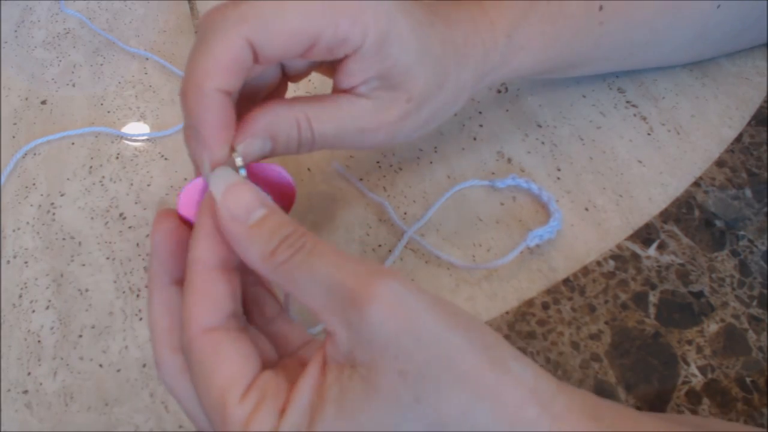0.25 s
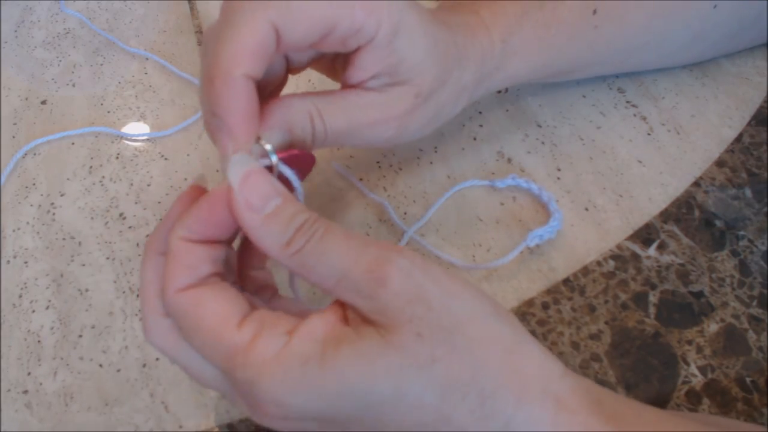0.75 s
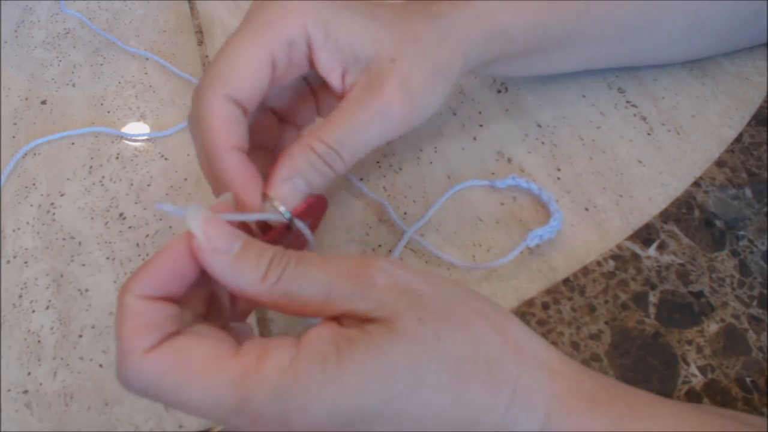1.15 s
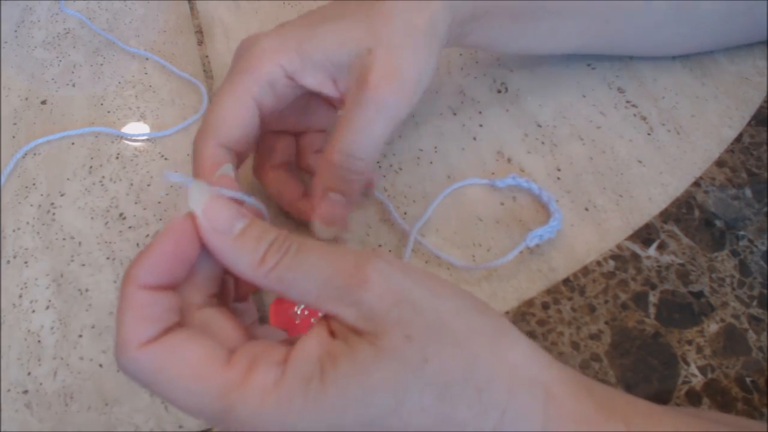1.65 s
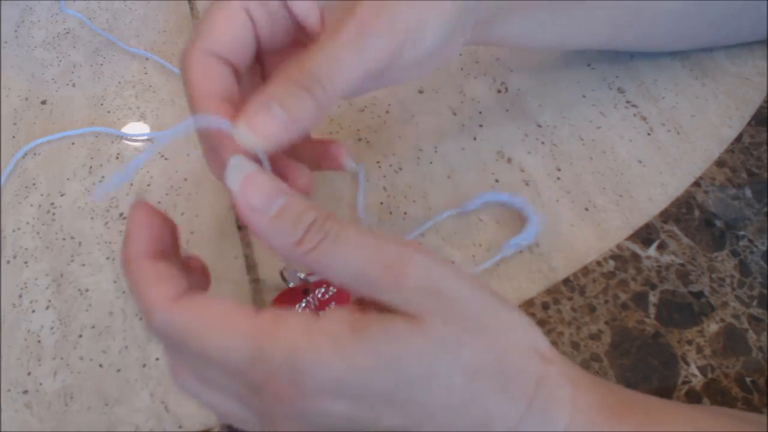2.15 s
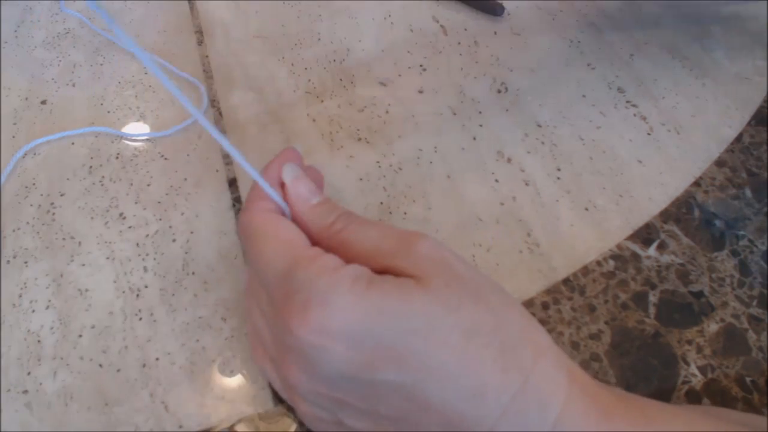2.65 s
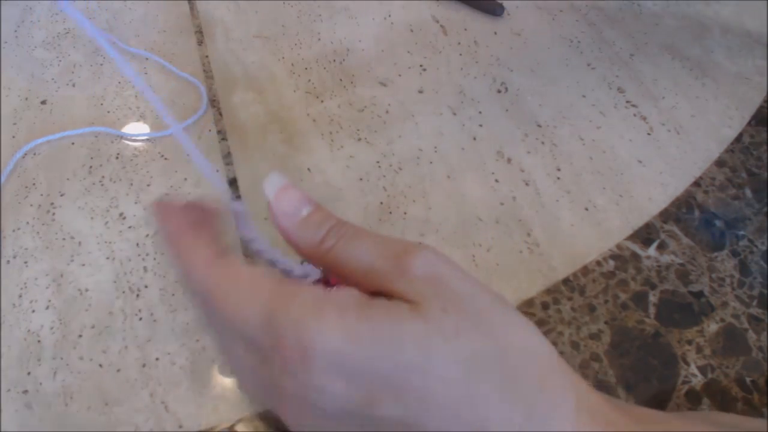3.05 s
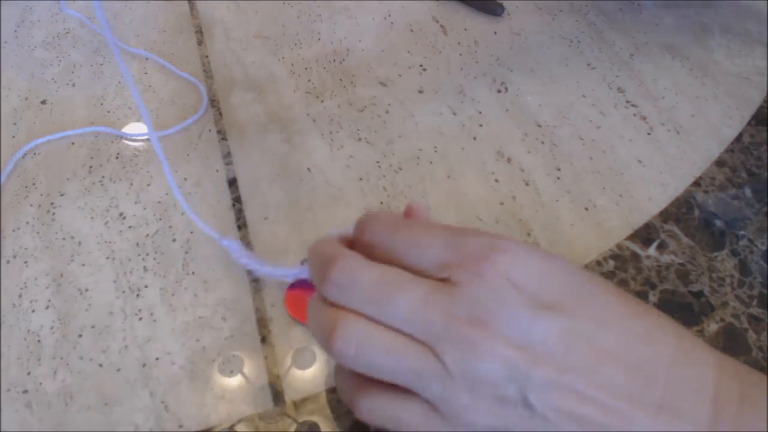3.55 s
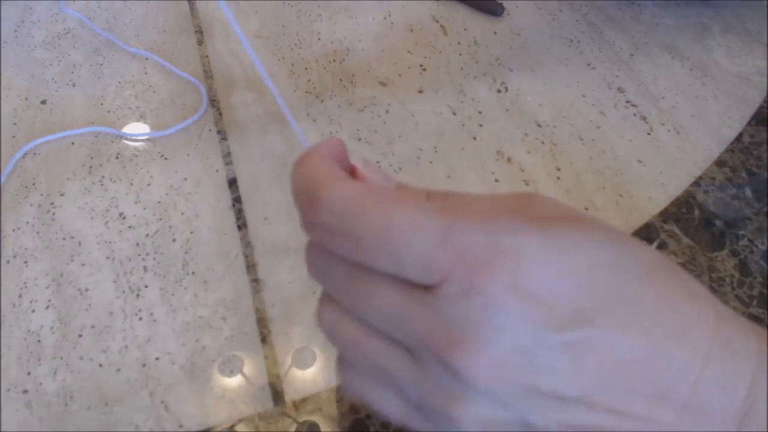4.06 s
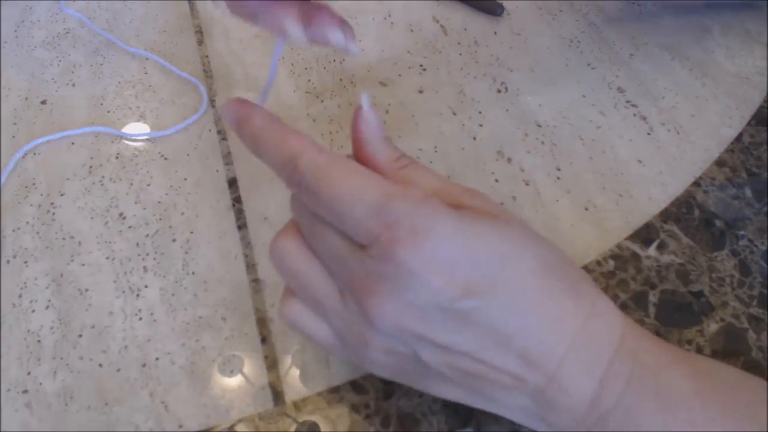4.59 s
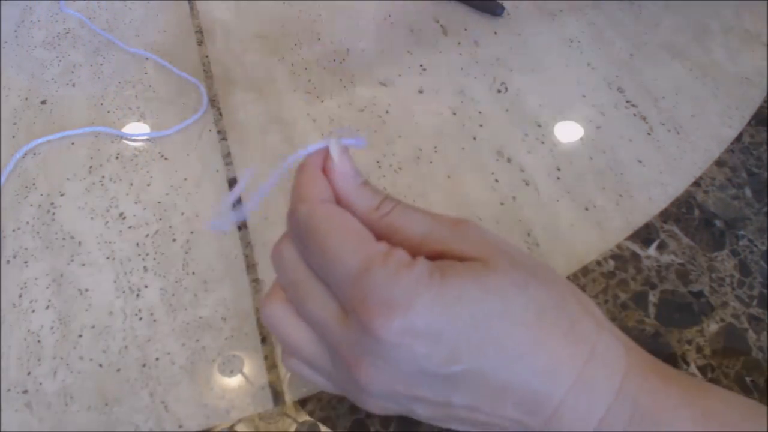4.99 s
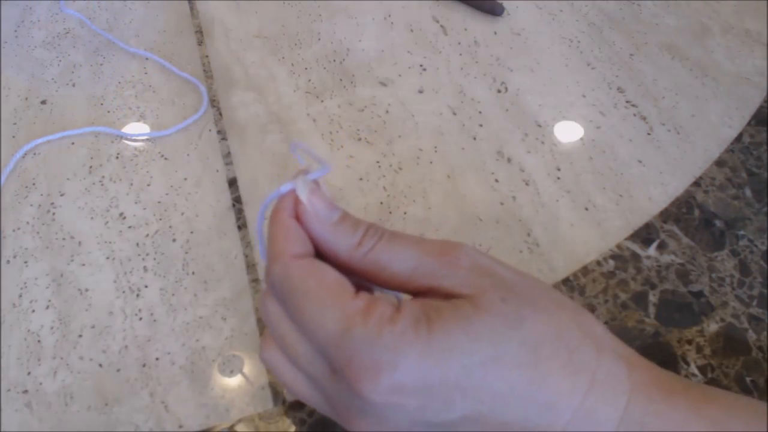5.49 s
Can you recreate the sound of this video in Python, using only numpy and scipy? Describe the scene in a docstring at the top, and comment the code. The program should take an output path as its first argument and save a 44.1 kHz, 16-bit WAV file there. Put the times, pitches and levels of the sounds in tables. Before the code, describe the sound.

Quiet indoor handling of a thin metal tag: faint rubs, a bright rattling burst on stone, later small clinks and one hard snap.

```python
"""In a quiet room, above a stone tabletop, hands thread a small metal pet tag and its split ring onto a cord.
The tag drops, bounces and jangles on the stone, then clinks against the ring as the cord is pulled.
Metal and stone are sums of dying modes with noise at each contact; cord rubs and faint tag ticks are
grainy band-passed noise. Crackles of overload join some hard clinks; room air, hum and a pulsing whine
lie beneath, and the microphone passes only a narrow band."""
import sys
import numpy as np
from scipy import signal
from scipy.fft import rfft, irfft
from scipy.io import wavfile
from scipy.ndimage import uniform_filter1d

SR = 44100
rng = np.random.default_rng(int(sys.argv[2]) if len(sys.argv) > 2 else 0)


def transcribe(signal):
    """Save signal, clipped to [-1, 1], as a 16-bit WAV file at the path in sys.argv[1]."""
    frames = np.atleast_2d(signal).T
    limited = np.clip(frames, -1, 1)
    pcm = np.round(limited * 32767).astype(np.int16)
    wavfile.write(sys.argv[1], SR, pcm)


N = 252671
TIME = np.arange(N) / SR   # seconds into the scene
AGE = TIME[:SR // 4]   # seconds since a blow


def from_db(db):
    """Logarithmic level: decibels become an amplitude gain."""
    return 10 ** (np.asarray(db) / 20)


def decay(t, t60):
    """Exponential damping: the envelope loses 60 dB in t60 seconds."""
    return np.exp(-np.log(1000) * t / t60)


def add(track, s, sound):
    """Superposition: mix a sound into a track from time s in seconds."""
    start = int(round(s * SR))
    track[..., start:start + sound.shape[-1]] += sound[..., :N - start]


def pan(db):
    """Interaural level difference: left and right gains, db apart."""
    return from_db([[db / 2], [-db / 2]])


def butter(x, hz, kind, order):
    """Causal Butterworth filtering, low- or high-pass."""
    sections = signal.butter(order, min(hz, SR / 2 - 1), kind, fs=SR, output="sos")
    return signal.sosfilt(sections, x)


def colour(x, spectrum, power=1):
    """Spectral shaping: weight each frequency by (Hz, dB) points joined on a log-frequency axis."""
    hz, db = np.transpose(spectrum)
    log_hz = np.log(np.fft.rfftfreq(len(x), 1 / SR) + 1)
    gain = from_db(power * np.interp(log_hz, np.log(hz), db))
    return irfft(rfft(x) * gain, len(x))


def noise(spectrum, size):
    """Coloured Gaussian noise of rms 1."""
    x = colour(rng.standard_normal(size), spectrum)
    return x / x.std()


def mode(hz, t60):
    """Damped resonance: one dying sine, its phase set by where the blow lands."""
    return np.sin(2 * np.pi * (hz * AGE + rng.random())) * decay(AGE, t60)


# Room air common to both ears. Each row: frequency in Hz, relative level in dB per Hz.
AIR = [(18, -65.5), (30, -36.5), (49, -30.5), (125, -3.5), (173, -11.5), (204, 0.5), (519, -18.5),
       (976, -17), (1350, -26.5), (2670, -27), (3140, -36.5), (4670, -33), (5900, -35.5), (6950, -28.5),
       (8000, -44), (10400, -74.5), (17600, -120)]
# Room air that differs between the ears. Each row: frequency in Hz, relative level in dB per Hz.
AIR_SIDE = [(35, -52.5), (60, -23.5), (205, 0), (582, -23), (2200, -42), (3830, -35), (8000, -47),
            (10400, -71.5), (17600, -120)]
# Balance of the background. Each row: frequency in Hz, left-right difference in dB.
AIR_BALANCE = [(60, -1), (160, -3), (420, -4.0), (1120, 1), (2980, 0), (7920, -0.5)]
AIR_DB = -65.5   # rms
HUM_HZ, HUM_DB = 200.5, -69
WHINE_HZ, WHINE_DB, WHINE_PULSE_HZ = 6780, -74.5, 30


def background(side_db=-14, whine_width_hz=70, pulse_start_s=0.025):
    """Stationary noise and tones: room air, hum, and an electrical whine modulated in phase and amplitude."""
    air = from_db(AIR_DB) * noise(AIR, N)
    hum = from_db(HUM_DB) * np.sin(2 * np.pi * HUM_HZ * TIME)

    waver = butter(rng.standard_normal(N), whine_width_hz, "low", order=2)
    phase = 2 * np.pi * WHINE_HZ * TIME + waver / waver.std()
    # half-wave pulses: silent for half of every cycle
    pulses = np.maximum(np.sin(2 * np.pi * WHINE_PULSE_HZ * (TIME - pulse_start_s)), 0)
    whine = from_db(WHINE_DB) * pulses * np.sin(phase)

    common = air + hum + whine
    both = np.array([colour(common, AIR_BALANCE, power) for power in (.5, -.5)])
    side = from_db(AIR_DB + side_db) * noise(AIR_SIDE, N)
    return both + side * [[1], [-1]]


# Colour of the early reflections. Each row: frequency in Hz, relative level in dB.
EARLY_COLOUR = [(100, -20), (400, -0.5), (1000, 8.5), (3200, 0), (5000, -1), (7000, -6.5), (9000, -8)]
# Colour of the room's tail. Each row: frequency in Hz, relative level in dB.
LATE_COLOUR = [(100, -27), (400, -9.5), (1200, 0), (3200, -7), (5000, -6.5), (7000, -5.5), (9000, -8)]


def room(x, early_db=-11, early_t60=0.12, late_db=-16, late_t60=.33, side_db=-10, gap_s=0.008):
    """Reverberation by convolution: short reflections from nearby surfaces and a weaker, longer tail."""
    t, response = TIME[:SR // 2], 0
    for db, t60, spectrum in [(early_db, early_t60, EARLY_COLOUR), (late_db, late_t60, LATE_COLOUR)]:
        onset = 1 - np.exp(-(t / gap_s) ** 2)
        envelope = onset * decay(t, t60)
        side = from_db(side_db) * noise(spectrum, len(t))
        echoes = noise(spectrum, len(t)) + side * [[1], [-1]]
        response = response + from_db(db) * envelope / np.linalg.norm(envelope) * echoes
    return signal.fftconvolve(x, response, axes=1)[:, :N]


def suppressor(x, threshold_db=-62, size=512):
    """Spectral gating: each band closes as it sinks towards the room air, which cuts the tails short."""
    hz, _, bands = signal.stft(x, SR, nperseg=size)
    ear_mean = np.mean(abs(bands) ** 2, axis=0)
    power = uniform_filter1d(ear_mean, size=9, axis=0).clip(0)   # smoothed over neighbouring bands
    threshold = from_db(threshold_db + np.interp(hz, *np.transpose(AIR)))[:, None] ** 2
    gain = power / (power + threshold)
    return signal.istft(bands * gain, SR, nperseg=size)[1][:, :N]


# Cord and fingertips rubbing, and faint ticks of the tag. Each row: time of the peak in seconds,
# half length in seconds, level in dB, centre frequency in Hz.
RUBS_AND_TICKS = [(0.478, .007, -61.5, 5900), (0.956, .011, -61.5, 2780), (1.148, .01, -64, 4800),
                  (1.377, .011, -67.5, 5860), (1.559, 0.061, -66, 7000), (2.193, 0.015, -51, 5400),
                  (3.009, 0.019, -56, 6223), (3.477, 0.071, -70, 4260), (3.63, .01, -61.5, 5130),
                  (4.059, 0.033, -59, 6710), (4.211, .02, -54, 6280), (5.221, 0.0054, -53, 3990)]
HISS_WIDTH = 0.85   # resonator bandwidth as a share of the centre
HISS_GRAIN = .65   # unevenness of the hiss


def rubs_and_ticks():
    """Resonant filtering of noise: short, grainy swells of hiss for cord rubs and faint tag ticks."""
    out = np.zeros(N)
    for s, half, db, hz in RUBS_AND_TICKS:
        reach = int(3 * half * SR)
        t = np.arange(-reach, reach) / SR
        hiss, grains = rng.standard_normal((2, SR))[:, :len(t)]
        # each grain lasts 32 samples
        hiss = hiss * np.exp(HISS_GRAIN * np.repeat(grains, 32)[:len(t)])
        radius = np.exp(-np.pi * HISS_WIDTH * hz / SR)
        poles = [1, -2 * radius * np.cos(2 * np.pi * hz / SR), radius ** 2]
        for _ in range(2):
            hiss = signal.lfilter([1, 0, -1], poles, hiss)
        swell = np.exp(-(t / half) ** 2)
        add(out, s + t[0], from_db(db) * hiss / hiss.std() * swell)
    return out


# Overload crackles. Each row: start in seconds, length in seconds, mean rate of rail-to-rail swings in Hz.
CRACKLES = [(1.7476, 0.00065, 500), (1.7613, .006, 1900), (1.768, 0.0041, 200), (1.7716, 0.0017, 1600),
            (1.7796, .006, 1200), (1.8105, .0004, 500), (4.2476, .0004, 2570)]
RAIL_DB = -6   # every crackle hits the same rails


def crackles(jitter=0.67, hash_db=-7, apart_db=-21, recover_hz=110):
    """Saturation: in overload the signal slams unevenly from rail to rail, with a hash on top."""
    out = np.zeros((2, N))
    for s, length, hz in CRACKLES:
        size = max(int(length * SR), 2)
        wander, hash_, apart = rng.standard_normal((3, len(AGE)))[:, :size]
        pace = np.exp(jitter * np.repeat(wander, 8)[:size])   # held for 8 samples at a time
        cycles = np.cumsum(hz * pace / pace.mean()) / SR
        rails = -np.sign(np.sin(2 * np.pi * cycles))
        side = from_db(apart_db) * apart * [[1], [-1]]
        add(out, s, from_db(RAIL_DB) * (rails + from_db(hash_db) * hash_ + side))
    return butter(out + 1e-18, recover_hz, "high", order=2)   # the offset avoids denormal numbers


DROP_S, DROP_GAP_S, RESTITUTION = 1.632, .0175, .87   # first contact, first flight, share kept by each flight


def bounces(count=4):
    """Restitution: the dropped tag meets the stone after flights that each keep a fixed share of the last."""
    flights = DROP_GAP_S * RESTITUTION ** np.arange(count - 1)
    return DROP_S + np.cumsum(np.r_[0, flights])


# Knocks on the tabletop. Each row: start in seconds, level in dB, low-pass frequency in Hz above which
# it is dull.
KNOCKS = [(1.7315, -24, 3500), (1.7475, -20, 3000), (1.781, -10.5, 3000), (2.869, -36, 1250),
          (2.878, -41, 1190), (3.6332, -21, 550), (3.824, -43, 2000), (3.842, -40, 1800),
          (3.913, -39, 1600), (4.248, -18.5, 3800)]
# Tabletop modes. Each row: frequency in Hz, relative level in dB, 60 dB decay time in seconds.
TOP = [(330, -6, 0.12), (523, -3, 0.17), (694, 1, 0.042), (1018, 2.5, 0.098), (1234, -0.5, 0.1),
       (1732, -11, 0.027)]
# Noise of a blow on stone. Each row: frequency in Hz, relative level in dB per Hz.
THUD = [(100, -29), (300, -10.5), (600, -2), (1200, -2), (3000, 4.5), (6000, -5.5), (9000, -18)]
DROP_KNOCK_DB, BOUNCE_LOSS_DB = -17.5, 2.5   # first bounce, loss at each later one
KNOCK_PAN_DB = 1.5   # left-right


def knocks(modes_db=-19, crack_db=-3, crack_t60=.006, thud_db=-13, thud_t60=0.091, slab_low_hz=230,
           drop_dull_hz=3600):
    """Impact on a slab: a crack, then short modes in a dense thud, each blow with its own dullness."""
    out = np.zeros((2, N))
    drop = [(s, DROP_KNOCK_DB - BOUNCE_LOSS_DB * k, drop_dull_hz) for k, s in enumerate(bounces())]
    for s, db, dull_hz in drop + list(KNOCKS):
        modes = sum(from_db(level + modes_db) * mode(hz, t60) for hz, level, t60 in TOP)
        crack = from_db(crack_db) * decay(AGE, crack_t60)
        thud = from_db(thud_db) * decay(AGE, thud_t60)
        blow = modes + (crack + thud) * noise(THUD, len(AGE))
        knock = butter(blow, dull_hz, "low", order=2)
        # the heavy slab gives little bass
        knock = butter(knock, slab_low_hz, "high", order=3)
        add(out, s, from_db(db) * knock * pan(KNOCK_PAN_DB))
    return out


# Strikes on the loose split ring. Each row: start in seconds, level in dB.
RING_STRIKES = [(1.6255, -40), (1.7235, -26.5), (1.773, -25)]
SPLIT_RING_HZ, SPLIT_RING_T60 = 4355, 0.13
DROP_RING_DB = -29   # at every bounce of the tag


def split_ring(contact_s=0.00018):
    """Single-mode resonance: the wire ring has one clear note, its onset softened by the contact time."""
    out = np.zeros(N)
    strikes = [(s, DROP_RING_DB) for s in bounces()] + list(RING_STRIKES)
    for s, db in strikes:
        onset = 1 - np.exp(-AGE / contact_s)
        add(out, s, from_db(db) * mode(SPLIT_RING_HZ, SPLIT_RING_T60) * onset)
    return out


# Tag touching ring or stone. Each row: start in seconds, level in dB.
CLINKS = [ (1.624, -40), (1.7243, -6), (1.7453, -8), (1.759, -5), (1.773, -7.5), (1.7839, -8),
          (1.7966, -17), (1.808, -3.5), (1.8245, -20), (1.8431, -19), (1.868, -14), (1.8997, -16.5),
          (2.8641, -22.5), (2.952, -27.5), (3.802, -35.5), (3.809, -24.5), (3.821, -21), (3.836, -23.5),
          (3.843, -28), (3.889, -28), (3.899, -26), (3.91, -23.5), (4.027, -43), (4.084, -25), (4.108, -25),
          (4.1557, -28), (4.176, -23), (4.2169, -19), (4.2459, -1), (4.2526, -15.5), (4.303, -35)]
DROP_CLINK_DB = -23.5   # at every bounce
# light after-touches: mean gap in seconds, first loss, further loss of each next one, random spread
CHATTER_GAP_S, CHATTER_LOSS_DB, CHATTER_FADE_DB, CHATTER_SPREAD_DB = 0.023, 22.5, 3, 2


def touches(count=2):
    """Repeated contact: the tag's bounces, its clinks and the uneven chatter after each clink, as (s, dB)."""
    rows = [(s, DROP_CLINK_DB) for s in bounces()] + list(CLINKS)
    for s, db in CLINKS:
        delays = np.cumsum(CHATTER_GAP_S * (.5 + rng.random(count)))
        spread = CHATTER_SPREAD_DB * rng.standard_normal(count)
        losses = CHATTER_LOSS_DB + CHATTER_FADE_DB * np.arange(count) + spread
        rows += zip(s + delays, db - losses)
    return rows


# Tag modes. Each row: frequency in Hz, relative level in dB, share of the ring time.
TAG = [(4920, -16.5, 0.75), (5100, -18, 0.68), (6040, -19.5, 2.1), (6160, -14, 0.57), (6670, -9, 0.61),
       (6830, -0.5, 0.66), (7085, -3, 1.7), (7160, -3.5, .9), (7340, -5.5, 0.88), (7230, -7, 0.6)]
# Scratch of an edge. Each row: frequency in Hz, relative level in dB per Hz.
TICK = [(300, -43.5), (1000, -24.5), (2500, -21), (3400, -29.5), (4350, -16.5), (4750, -5), (5600, -6.5),
        (7200, 0), (8200, -8.5)]
# How long the grip lets the tag ring, long when loose and short between fingers.
# Each row: time in seconds, ring time (60 dB decay) in seconds.
GRIP = [(1.4, 0.024), (1.63, 0.11), (1.745, 0.076), (1.80, 0.027), (1.9, 0.024), (2.87, 0.03),
        (4.215, 0.016), (4.25, 0.031), (4.31, .02)]
SLIDE_S = 0.00079   # time for an edge to slide into contact
# scratch level at this ring time; it stands out more as the ring shortens
SCRATCH_DB, SCRATCH_RING_S, SCRATCH_DB_PER_HALVING = -5.5, 0.03, 1


def clinks(ring_db=-1, tick_t60=0.03, spread_db=2, grip_detune=0.0024):
    """Damped modal ringing: a touch scratches, and the tag rings until damped; the grip bends the modes."""
    out = np.zeros(N)
    for s, db in touches():
        ring_time = np.interp(s, *np.transpose(GRIP))
        scratch_db = SCRATCH_DB + SCRATCH_DB_PER_HALVING * np.log2(SCRATCH_RING_S / ring_time)
        tag = np.zeros(len(AGE))
        for hz, level, share in TAG:
            gain = from_db(level + spread_db * rng.normal())
            bent_hz = hz * (1 + grip_detune * rng.normal())
            tag += gain * mode(bent_hz, share * ring_time)
        # the blow sets the energy, however it is shared among the modes
        tag *= np.linalg.norm(decay(AGE, ring_time)) / (np.sqrt(2) * np.linalg.norm(tag))
        scratch = noise(TICK, len(AGE)) * decay(AGE, tick_t60)
        touch = from_db(ring_db) * tag + from_db(scratch_db) * scratch
        onset = 1 - np.exp(-AGE / SLIDE_S)
        add(out, s, from_db(db) * touch * onset)
    return out


def scene():
    """Superposition: suppressed direct and reverberant handling, with the crackles and background added."""
    handling = rubs_and_ticks() + knocks() + split_ring() + clinks()
    return background() + suppressor(handling + room(handling)) + crackles()


MIC_TOP_HZ, CUTOFF_HZ = 7500, 8300   # low-pass edges before and after the peaks are rounded


def record(dry, low_cut_hz=60):
    """Band-limiting and soft saturation: the microphone passes a narrow band, its input rounds the peaks."""
    top = .8   # amplitude that the rounding approaches
    narrow = signal.sosfilt(signal.ellip(8, .5, 88, MIC_TOP_HZ, fs=SR, output="sos"), dry)
    thinned = butter(narrow, low_cut_hz, "high", order=2)
    rounded = top * np.tanh(thinned / top)
    low_pass = signal.firwin(191, CUTOFF_HZ, fs=SR)[None]
    return signal.fftconvolve(rounded, low_pass, mode="same", axes=1)


dry = scene()
out = record(dry)
transcribe(out)
```